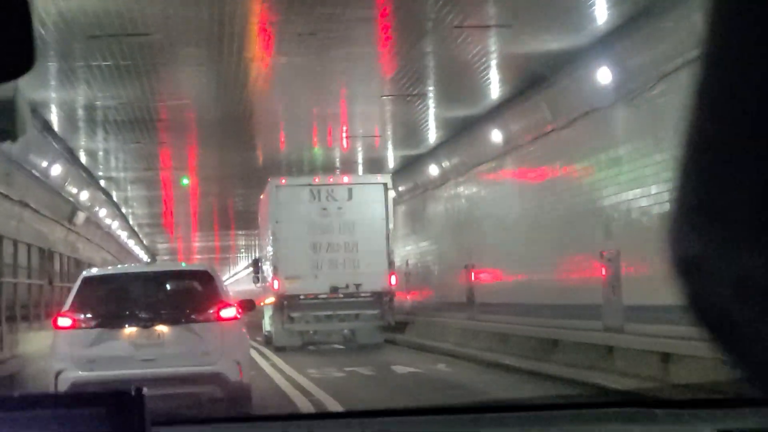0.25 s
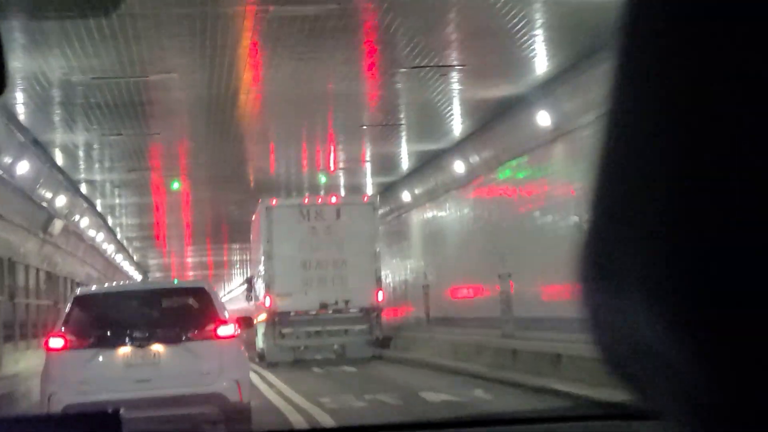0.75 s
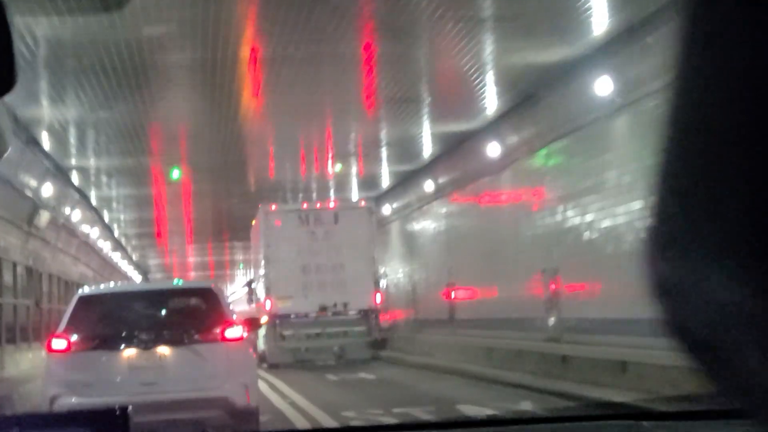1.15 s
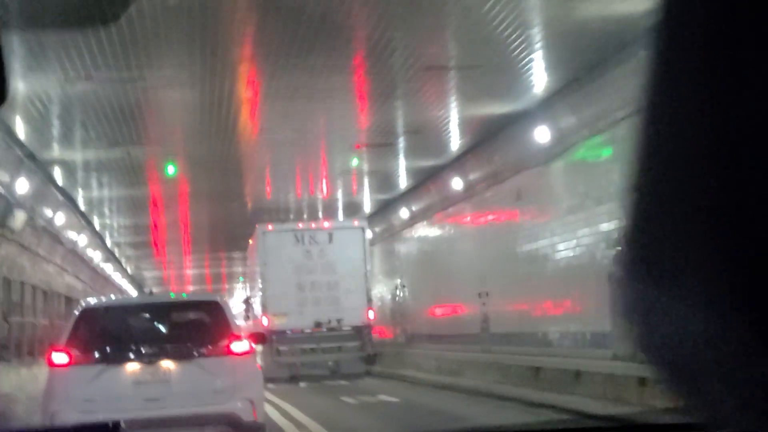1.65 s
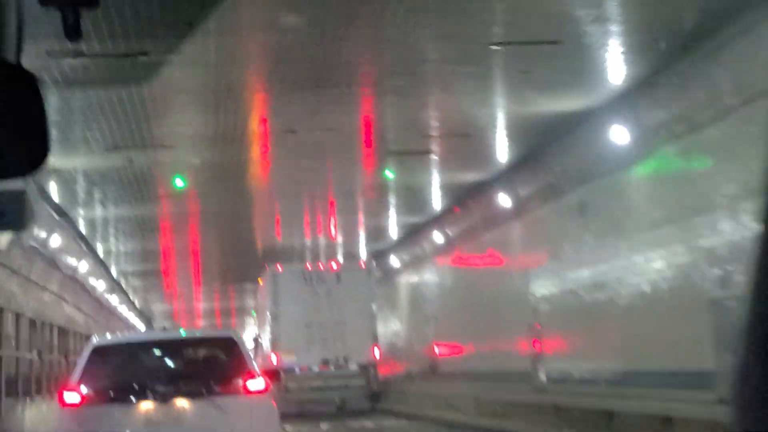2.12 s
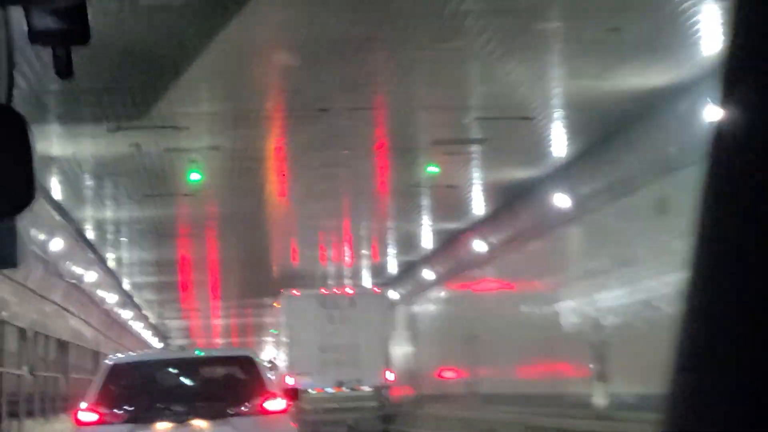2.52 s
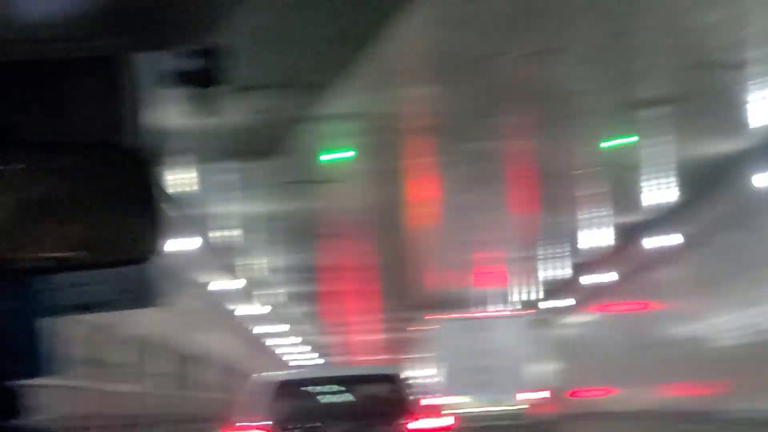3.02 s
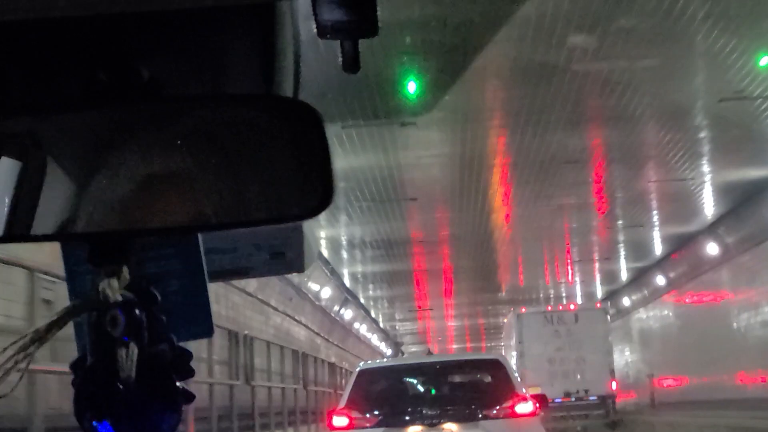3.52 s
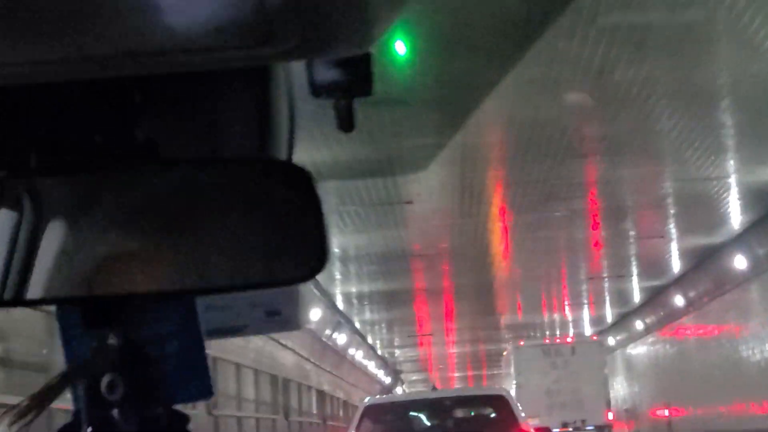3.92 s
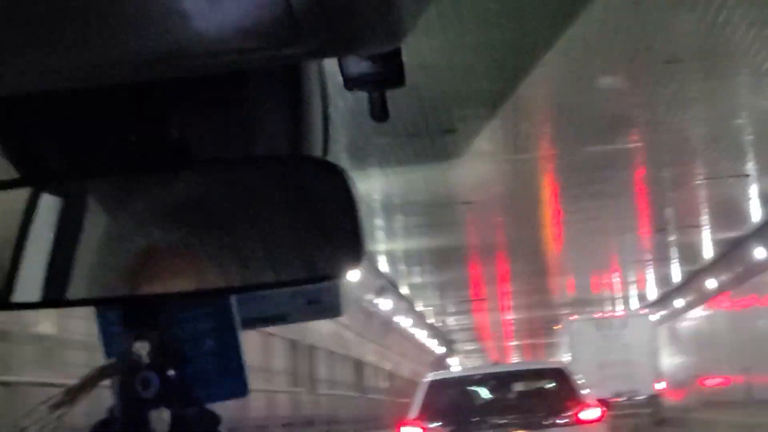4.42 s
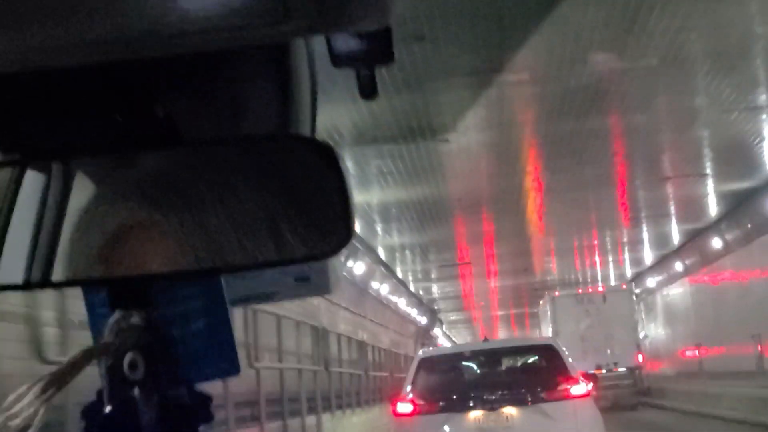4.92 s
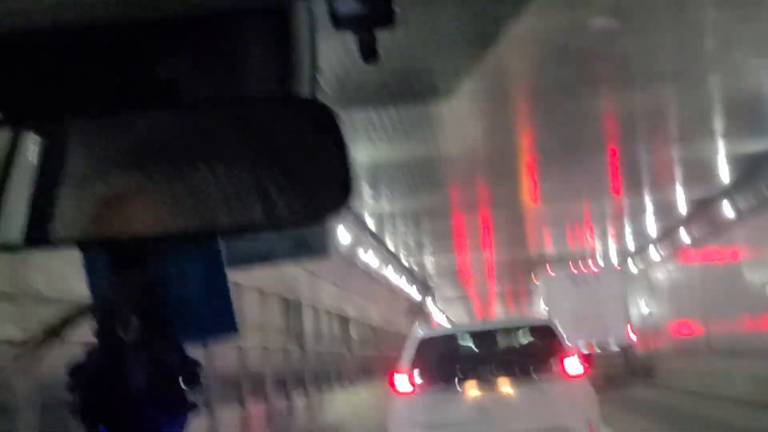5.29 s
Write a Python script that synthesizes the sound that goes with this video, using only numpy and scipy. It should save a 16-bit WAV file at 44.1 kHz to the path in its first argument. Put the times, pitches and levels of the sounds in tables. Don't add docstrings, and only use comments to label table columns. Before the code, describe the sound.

Inside a slow car in a tunnel: heavy bass hum, dull traffic roar, tiny metallic ticks, and late soft scratchy sleeve rustles.

```python
import sys
import numpy as np
from scipy import signal
from scipy.fft import rfft, irfft, next_fast_len
from scipy.io import wavfile
from scipy.ndimage import uniform_filter1d, minimum_filter1d, map_coordinates

SR = 44100
rng = np.random.default_rng(int(sys.argv[2]) if len(sys.argv) > 2 else 0)


def put_to_file(sound):
    columns = np.atleast_2d(sound).T
    safe = np.clip(columns, -1, 1)
    whole_steps = np.round(safe * 32767)
    wavfile.write(sys.argv[1], SR, whole_steps.astype(np.int16))


def nominal_scale(level):
    x = np.asarray(level, float) / 20
    return 10 ** x


N = 244755

# (time [s], length [s], pitch [Hz], level [dB])
CABIN_BOOM = [(.04, 0.081, 77, -8), (.15, .39, 81, -8), (.57, .45, 81.5, -8), (1.1, 0.23, 81.3, -7.5),
              (1.33, .17, 81, -6.5), (1.52, 0.26, 89, -16), (1.68, 0.099, 78, -9), (1.86, .08, 78, -7),
              (1.96, 0.21, 70, -13.5), (2.23, 0.22, 71, -17.5), (2.45, .16, 72, -12),
              (2.72, 0.24, 83, -20.5), (2.97, .1, 81, -12), (3.1, 0.07, 84, -12), (3.22, .25, 71.5, -16.5),
              (3.5, 0.11, 74, -7.5), (3.68, 0.087, 85, -15), (3.76, 0.14, 74.5, -10), (4.0, 0.27, 70, -23),
              (4.33, 0.16, 84, -17), (4.52, .25, 71, -16.5), (4.89, 0.18, 75, -12.5), (5.08, .1, 70, -14.5),
              (5.28, .3, 78, -10.5)]
# (time [s], length [s], pitch [Hz], level [dB])
TRUCK_DRONE = [
    (.02, 0.1, 186.3, -18),
    (.11, .35, 196.9, -16),
    (.48, .62, 198, -18.5),
    (1.2, .3, 198, -23.5),
    (1.56, .2, 197.2, -18),
]
# (time [s], length [s], pitch [Hz], level [dB])
OWN_ENGINE = [
    (2.08, 0.13, 157.4, -20),
    (2.3, .8, 158.2, -23),
    (3.2, 0.15, 157.5, -22),
    (4.05, 0.11, 161, -23),
    (4.79, 0.04, 153.5, -16),
    (5.1, .12, 154.7, -19.5),
    (5.3, 0.32, 154.4, -19.5),
]
# (time [s], length [s], pitch [Hz], level [dB])
FLOOR_TONE = [
    (0, 0.33, 128.3, -19.5),
    (1.0, 0.42, 127.6, -33.5),
    (1.48, 0.24, 124, -25),
    (2.6, 0.68, 123.5, -24.5),
    (3.3, 0.41, 125, -22),
    (3.85, 0.13, 121.6, -16),
    (4.2, .4, 121, -20.5),
    (5.0, 0.42, 121.9, -19),
]


def engines():
    drone = tone(TRUCK_DRONE, pan_db=-1.1, rough_db=1.7)
    doubled = drone ** 2 / (np.abs(drone) + 1e-9)
    octave = nominal_scale(-15.5 + 1.8 * wobble(28)) * doubled
    boom = tone(CABIN_BOOM, pan_db=-.7, rough_db=1.1)
    hum = tone(OWN_ENGINE, pan_db=-0.5, rough_db=1.5)
    panel = tone(FLOOR_TONE, pan_db=-4.0, rough_db=5.0)
    return (boom + hum + panel + drone + octave).real


# (frequency [Hz], density [dB per Hz])
SUSPENSION = [(12, -39.5), (22, -17.5), (32, -2.5), (43, 3), (52, -9.5), (60, -16)]
# (frequency [Hz], density [dB per Hz])
FLOOR_DRUM = [(45, -42.5), (58, 2.5), (70, 2.5), (85, 1), (105, 2.5), (125, -2.5), (140, -7.5), (160, -2),
              (180, -10), (215, -6.5), (260, -46.5)]


def tyres():
    near_db, bumps_db = drive()
    thud = nominal_scale(-21 + bumps_db) * cabin_noise(SUSPENSION)
    drum_db = -14.5 - 0.37 * near_db
    drum = nominal_scale(drum_db) * patchy(cabin_noise(FLOOR_DRUM), depth_db=1.16)
    return thud + drum


# (time [s], hold [s], rustle level [dB], rub level [dB], left-right difference [dB])
STROKES = [(1.055, .55, -71.5, -72, -6.5), (1.785, .03, -69, -74, -4.5), (2.342, 0.17, -81.5, -74, -7),
           (2.616, .04, -68, -54.5, -8), (2.69, .05, -66, -52, -8), (2.801, .45, -73, -70.5, -5),
           (3.456, .025, -65.5, -53, -3.5), (3.556, .01, -74, -67, -3.5), (3.686, .03, -73, -56.5, -16.5),
           (3.719, 0.026, -72, -56, -13), (3.917, .02, -81.5, -73, -5.5), (4.232, 0.11, -69, -66, -10),
           (4.359, 0.056, -60.5, -46.5, -14.5), (4.46, .06, -65.5, -65.5, -11),
           (4.551, 0.04, -56.5, -55, -13), (4.624, 0.018, -52.5, -46, -15.5),
           (4.657, 0.059, -54.5, -49.5, -7), (4.802, 0.12, -74, -79, -6), (4.971, .05, -74, -74, -9.5),
           (5.062, 0.079, -69, -58, -15.5), (5.217, 0.027, -66, -51, -15),
           (5.368, 0.053, -55.5, -51.5, -15), (5.438, 0.059, -52.5, -50.5, -8),
           (5.545, 0.025, -47, -43, -10)]
# (frequency [Hz], density [dB per Hz])
CLOTH_RUSTLE = [(1500, -39), (3500, -5), (6300, -2), (8900, -0.5), (10300, -2.5), (12500, 3.5), (14000, -5),
                (15800, -1.5)]
# (frequency [Hz], density [dB per Hz])
PORT_RUB = [(1200, -37), (1600, 1.5), (2100, -4), (2700, -4), (3500, 1), (4700, -8.5), (5800, -14.5),
            (7500, -37)]
# (time [s], peak [dB], left-right difference [dB])
FIBRE_SNAPS = [(4.2862, -51.5, -14.5), (4.3251, -49, -13), (4.3393, -47.5, -9.5), (4.3627, -45, -9.5),
               (4.5434, -39, -14), (4.554, -40, -15), (4.62, -43.5, -13), (5.065, -50.5, -16),
               (5.107, -49, -14.5), (4.9658, -45.5, -12), (2.633, -51.5, -10.5)]


def sleeve():
    grid = np.arange(0, N / SR + .002, .001)
    slip, press = 0, 0
    for s, hold, rustle_db, rub_db, pan_db in STROKES:
        shape = stroke(grid - s, hold)
        slip = slip + nominal_scale(rustle_db) * shape * sides(pan_db)[:, None]
        press = press + nominal_scale(rub_db) * shape * sides(0.97 * pan_db)[:, None]
    drawn = np.reshape(curves(np.transpose([grid, *slip, *press])), (2, 2, N))
    flutter_db = 1.1
    slip, press = nominal_scale(flutter_db * wobble(45)) * drawn
    cloth_at_rest = nominal_scale(-81) * sides(-5)[:, None]
    rustle = (slip + cloth_at_rest) * rush(CLOTH_RUSTLE, [(5000, 0)], grain_db=1.0)
    rub = press * rush(PORT_RUB, [(3000, 0)], grain_db=0.7)

    snaps, t = np.zeros((2, N + SR)), np.arange(SR // 100) / SR
    for s, db, pan_db in FIBRE_SNAPS:
        fade = nominal_scale(db - 8.0 - 60 * t / .005)
        crack = np.diff(rng.standard_normal((2, len(t) + 2)), 2) * fade
        snaps[:, round(s * SR):][:, :len(t)] += crack * sides(pan_db)[:, None]
    return rustle + rub + snaps[:, :N]


# (time [s], peak [dB], left-right difference [dB], loudest mode [Hz])
RATTLE_TICKS = [(0.8445, -53.5, -2, 9070), (0.9028, -54.5, -11, 9320), (0.9597, -45, -8.5, 9200),
                (1.0161, -47, -4, 9230), (1.0804, -45, -3, 9450), (1.1478, -51, 0, 9050),
                (1.2121, -46, -3.5, 13340), (1.2595, -53.5, -12, 8950), (1.2725, -50.5, -7.5, 8900),
                (1.3443, -53, -8.5, 9300), (1.4057, -50, -6, 9420), (1.4716, -52.5, -11.5, 9370),
                (1.5439, -50, -5, 9450), (1.6057, -53, -4.5, 9386), (1.6741, -55.5, -2, 8940),
                (1.79, -60, -8.5, 11500)]


def rattle():
    return trinket(RATTLE_TICKS, t60=.03, side_modes_db=-2.5, chatter_db=-4.5)


# (time [s], peak [dB], left-right difference [dB], loudest mode [Hz])
LONE_KNOCKS = [
    (2.5975, -59.5, -15, 12500),
    (2.8968, -53.5, -17, 12540),
    (3.2695, -42, -5.5, 11560),
    (4.9656, -55.5, -10, 8510),
]


def clinks():
    return trinket(LONE_KNOCKS, t60=.014, side_modes_db=-3.5, chatter_db=-10)


# (frequency [Hz], level [dB])
METAL_MODES = [(7300, -10.5), (9350, -16.5), (11000, -8), (12700, -14), (13500, -10), (15000, -19)]


def trinket(knocks, t60, side_modes_db, chatter_db):
    out, t = np.zeros((2, N + SR)), np.arange(SR // 10) / SR
    for s, db, pan_db, top_hz in knocks:
        ring = 0
        for hz, level in METAL_MODES:
            strength = nominal_scale(level + rng.normal(0, 3))
            ring = ring + strength * np.sin(2 * np.pi * hz * t * rng.normal(1, .01))
        loudest = 0.65 * np.sin(2 * np.pi * top_hz * t)
        blow = nominal_scale(-60 * t / max(t60, .005)) * (1 - np.exp(-t / .0005))
        bounce = nominal_scale(-9) * np.interp(t - .012, t, blow)
        knock = (nominal_scale(side_modes_db) * ring + loudest) * (blow + bounce)
        grit = np.diff(rng.standard_normal((2, len(t) + 1)))
        chatter = nominal_scale(chatter_db) * grit * nominal_scale(-60 * t / 0.078) * (1 - np.exp(-t / .003))
        out[:, round(s * SR):][:, :len(t)] += (knock + chatter) * nominal_scale(db - 3) * sides(pan_db)[:, None]
    return out[:, :N]


# (frequency [Hz], density [dB per Hz])
EXHAUST_GROWL = [(300, -30), (380, -1.5), (530, 2.5), (640, -7.5), (800, -30)]


def exhaust():
    fading = nominal_scale(-28 - 7 * np.arange(N) / SR)
    return fading * patchy(cabin_noise(EXHAUST_GROWL), depth_db=2.0)


# (frequency [Hz], density [dB per Hz])
TUNNEL_ROAR = [(170, -41), (220, 0.5), (300, -3.5), (380, -7.5), (520, -6.5), (650, -14), (850, -19.5),
               (1100, -31.5), (1400, -54)]
# (frequency [Hz], density [dB per Hz])
GLASS_WASH = [(700, -37.5), (950, -0.5), (1250, -4.5), (1500, -10.5), (2000, -15.5), (3000, -19),
              (3700, -17), (4700, -21.5), (5500, -27.5), (6300, -43.5), (8500, -52), (11000, -64)]


def traffic():
    near_db, _ = drive()
    roar_db = -21 + .5 * near_db + 0.35 * wobble(7)
    roar = nominal_scale(roar_db) * patchy(cabin_noise(TUNNEL_ROAR), depth_db=0.93)
    wash = nominal_scale(-37.5 + near_db + 0.15 * wobble(8)) * cabin_noise(GLASS_WASH)
    return roar + wash


# (frequency [Hz], density [dB per Hz])
MIC_HISS = [(4000, -28), (6000, 8), (7500, 3), (8700, 5.5), (9800, -3.5), (11500, 0), (15800, 1.5)]


def hiss():
    return nominal_scale(-80) * rush(MIC_HISS, [(8000, 0)])


# (time [s], traffic nearness [dB], bumpiness [dB])
DRIVE = [(0, -0.5, 7), (.35, 0, -2.5), (1.2, -1.5, -2.5), (1.7, -1.5, 0), (2, -6, -1.5), (2.6, -5, 1.5),
         (3.1, -4.5, -1), (3.5, -5, 8), (3.9, -4, 0), (4.15, -3.5, 8), (4.35, -1.5, 1.5), (4.6, -2, 9),
         (4.9, -3, 4), (5.25, -2, 1.5), (5.55, -1, 3)]


def drive():
    return curves(DRIVE)


# (frequency [Hz], left-right likeness [0 to 1])
CABIN_LIKENESS = [(20, 0.97), (45, 0.97), (70, .99), (125, 0.91), (250, 0.88), (500, 0.86), (1000, 0.12),
                  (2000, 0.08)]


def cabin_noise(spectrum):
    return rush(spectrum, CABIN_LIKENESS)


# (frequency [Hz], left-right difference [dB])
STEREO_LEAN = [(30, .3), (125, -1), (250, -.4), (500, -1.8), (1000, -1), (4000, -2)]


def rush(spectrum, alike, grain_db=0):
    m = next_fast_len(N + 8192)
    hz = np.fft.rfftfreq(m, 1 / SR)
    closed = [(1, -120), *spectrum, (SR, -120)]
    pair = rng.standard_normal((2, N)) * nominal_scale(grain_db * wobble(400))
    turn = np.arccos(np.clip(along(alike, hz), -1, 1)) / 2
    mid, side = rfft(pair, m) * nominal_scale(along(closed, hz)) * [np.cos(turn), np.sin(turn)]
    stereo = np.array([mid + side, mid - side]) * sides(along(STEREO_LEAN, hz))
    return unit(irfft(stereo, m)[:, :N])


def tone(rows, pan_db, rough_db):
    edge = 0.1
    t, surges = np.arange(N) / SR, np.zeros(N, complex)
    for s, length, hz, db in rows:
        near = slice(max(int((s - edge) * SR), 0), int((s + length + edge) * SR))
        spin = np.exp(2j * np.pi * hz * t[near])
        surges[near] += nominal_scale(db) * swell(t[near] - s, length, edge) * spin
    shake = nominal_scale(rough_db * wobble(18)) * np.exp(.15j * rough_db * wobble(14))
    return np.sqrt(2) * surges * shake * sides(pan_db)[:, None]


def swell(t, length, edge):
    inside = np.minimum(t, length - t)
    return np.sin(np.pi / 2 * np.clip(inside / edge + .5, 0, 1)) ** 2


def stroke(t, hold):
    rise, fall = 0.041 + 0.37 * hold, 0.044 + 0.37 * hold
    before, after = np.maximum(-t, 0), np.maximum(t - hold, 0)
    return nominal_scale(-20 * (before / rise + after / fall))


def patchy(x, depth_db):
    z = signal.stft(x, nperseg=2048)[2]
    field = uniform_filter1d(rng.standard_normal(z.shape[1:]), size=3, axis=0)
    field = uniform_filter1d(field, size=6, axis=1)
    return unit(signal.istft(z * nominal_scale(depth_db * unit(field)), nperseg=2048)[1][:, :N])


def unit(x):
    return x / np.sqrt(np.mean(x ** 2) + 1e-20)


def along(points, hz):
    f, v = np.transpose(points)
    return np.interp(np.log(hz + 1), np.log(f + 1), v)


def curves(rows):
    s, *cols = np.transpose(rows)
    return [np.interp(np.arange(N) / SR, s, c) for c in cols]


def wobble(rate):
    knots = rng.standard_normal(int(N * 400 / SR) + 4)
    return map_coordinates(knots, [np.arange(N) * min(rate, 400) / SR])


def sides(pan_db):
    return nominal_scale(np.array([pan_db / 2, -pan_db / 2]))


def scene():
    close = engines() + tyres() + sleeve() + rattle() + clinks()
    tunnel = exhaust() + traffic()
    return close + tunnel


def band_limit(x):
    return signal.sosfilt(signal.butter(12, 15610, fs=SR, output="sos"), x)


def record(dry):
    x = dry + hiss()
    need = np.clip(1.1 / (np.abs(x).max(axis=0) + 1e-9), .85, 1)
    x = x * uniform_filter1d(minimum_filter1d(need, size=1500), size=1400)
    mix = x / (1 + np.abs(x / .92) ** 6) ** (1 / 6)
    return band_limit(mix)


dry = scene()
out = record(dry)
put_to_file(out)
```